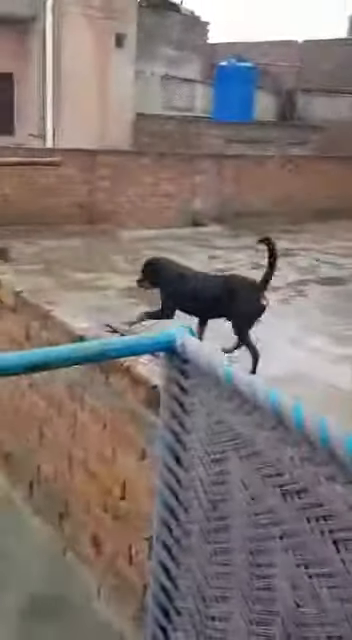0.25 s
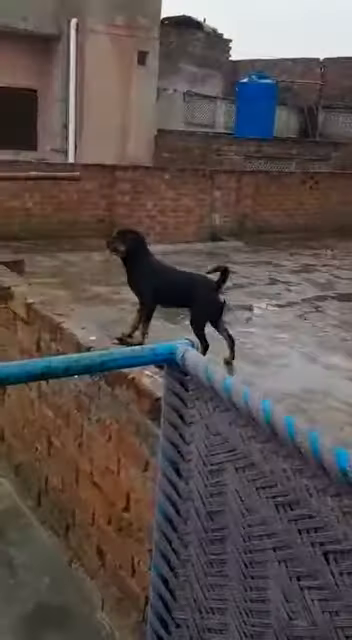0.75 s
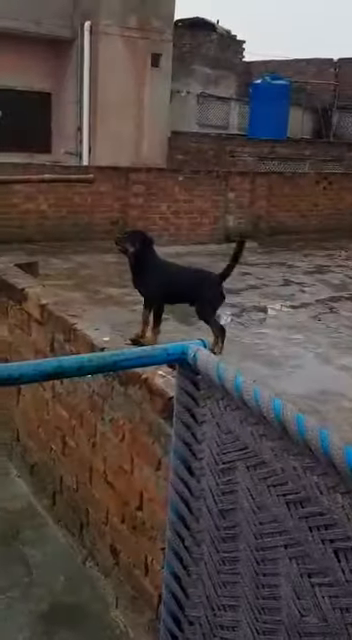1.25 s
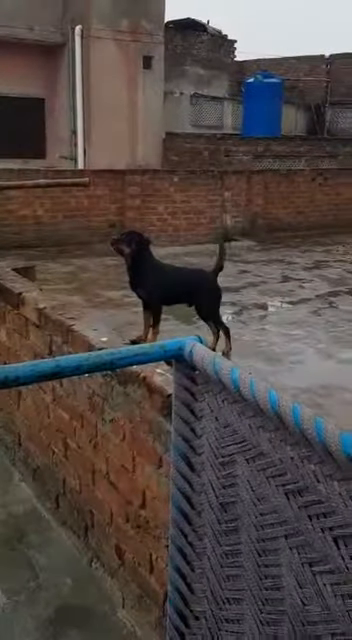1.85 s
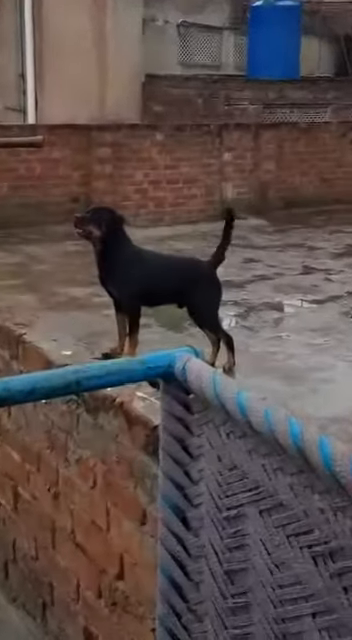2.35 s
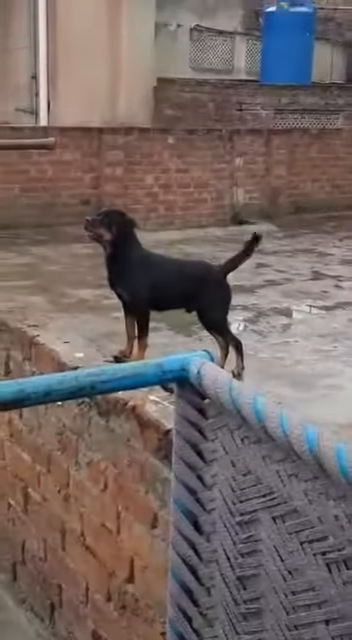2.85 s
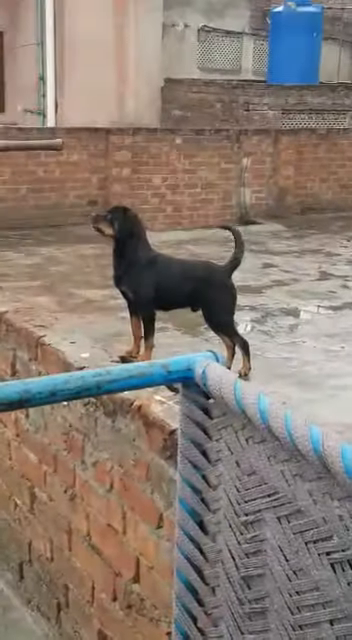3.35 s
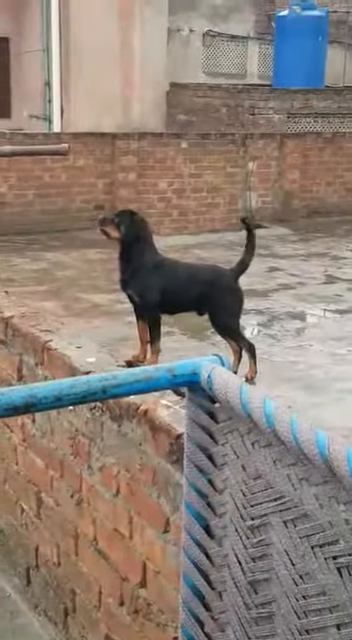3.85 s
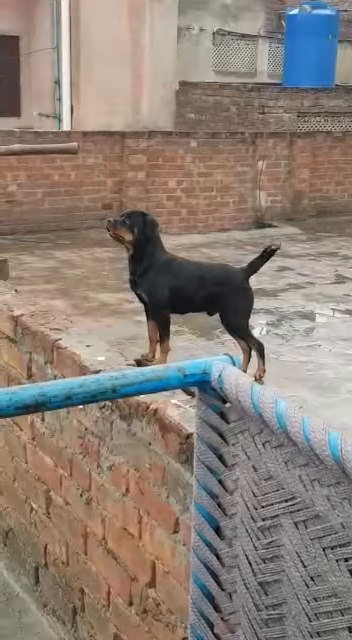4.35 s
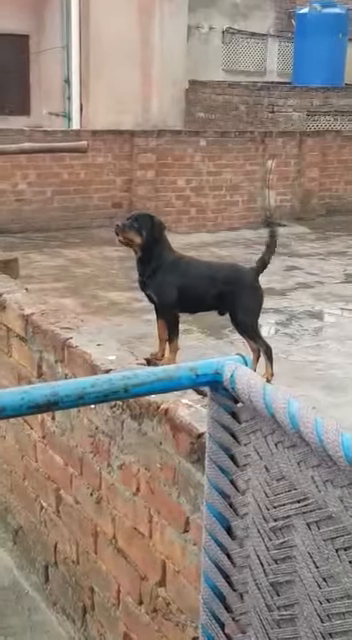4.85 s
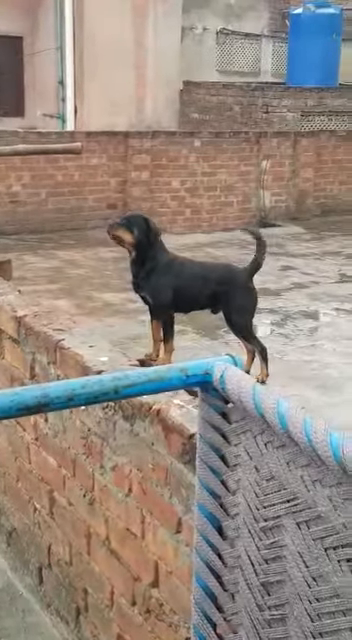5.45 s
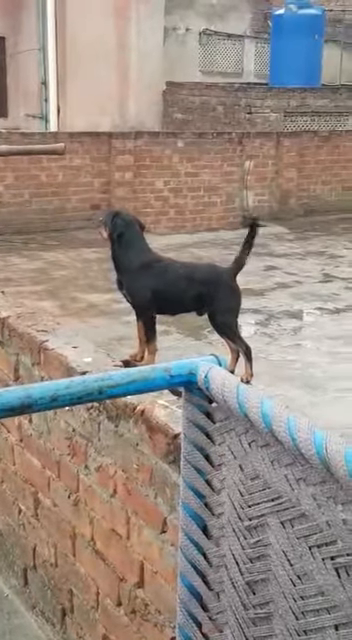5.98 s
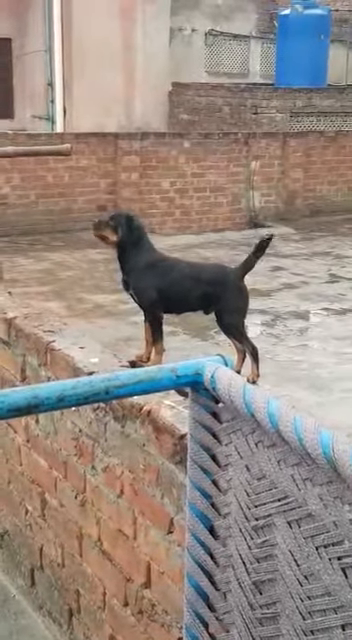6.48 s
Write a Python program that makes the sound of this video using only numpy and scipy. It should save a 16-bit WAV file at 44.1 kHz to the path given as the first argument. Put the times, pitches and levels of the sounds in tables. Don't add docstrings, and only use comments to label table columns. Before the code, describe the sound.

A walled rooftop outdoors, picked up by a stereo phone a few metres from a large dog. A low, distant traffic murmur runs throughout, and the end of a faint huff opens it. Short barks, about a tenth of a second each, glide upward, crack into rough undertones and echo off house fronts with nearly a second of ring. They come at 0.4, then a yip at 0.65 dropping straight into a strong bark at 0.7; then 2.0, 2.3 and 2.6; a very soft woof at 3.1 after a faint nose huff; then 3.9, 4.2 and 4.55. From 4.3 to 4.9 wind buffets the microphone with deep thumps. Around 4.8 to 5.0 the dog huffs sharply and collar links clink. Lighter thumps follow to 5.3, a faint hiss at 5.45, and a barely audible distant brake squeal near 6. Two last barks come at 6.3 and 6.6, with wind returning before the end at 6.7.

```python
import sys
import numpy as np
from scipy import signal
from scipy.fft import rfft, irfft, next_fast_len
from scipy.io import wavfile
from scipy.ndimage import uniform_filter1d, map_coordinates

SR = 44100
rng = np.random.default_rng(int(sys.argv[2]) if len(sys.argv) > 2 else 0)


def pcm_store(signal):
    levels = np.round(np.clip(np.atleast_2d(signal), -1, 1) * 32767)
    wavfile.write(sys.argv[1], SR, levels.astype(np.int16).T)


def makeup_ratio(level_db):
    decades = np.asarray(level_db, float) / 20
    return 10 ** decades


N = 296352

# [f/Hz, width/Hz, level/dB]
UNDERTONE_THROAT = [(701, 99, -3), (1332, 99, -14), (1960, 310, -20)]
RASP_THROAT = [(468, 140, -3.5), (678, 88, 1.5), (1066, 195, -1), (1370, 580, -10), (1980, 590, -14)]
# [f/Hz, level/dB per Hz]
BREATH_COLOUR = [(1500, -29.5), (2600, -22.5), (3400, -15), (3900, 4), (4300, -11.5), (4900, 1.5),
                 (5900, -1.5), (7400, -13), (8200, -29.5), (10000, -19.5), (15700, -34)]


def bark(row, breaking, mouth_db, jitter, shimmer_db):
    start, length, peak_db, first_hz, top_hz = row
    glide, breaks, under_db, rasp_db, breath_db = breaking
    t = np.arange(SR // 4) / SR - .02

    def shake(rate):
        return wobble(rate, size=len(t))

    def left(span):
        return np.clip(1 - t / span, 0, 1)

    after_glide = np.maximum(t - glide, 0)
    pitch = top_hz - (top_hz - first_hz) * left(glide) ** 1.404 - 74 * after_glide
    level_db = peak_db - 12 * left(0.94 * glide) ** 1.67 - 54.5 * after_glide
    whole = np.clip((breaks - t) / 0.018, 0, 1)
    unsteady = jitter * (1 + 1.28 * (1 - whole)) * shake(122.54)
    cycle = 2 * np.pi * np.cumsum(pitch * (1 + unsteady)) / SR

    orders_db = [mouth_db[0], 0, *mouth_db[1:], mouth_db[-1] - 12]
    voice = unit(sum(makeup_ratio(db + shimmer_db * shake(60.7)) * np.cos((k + 1) * cycle + k)
                     for k, db in enumerate(orders_db)))

    thirds = sum(np.cos(k * (cycle + 1.6 * shake(40.03)) / 3) for k in range(2, 14) if k % 3)
    air = rng.standard_normal((2, len(t)))
    puffs = (1 + 0.54 * np.cos(cycle)) * air[0]
    rough = makeup_ratio(under_db - 23.5 * whole) * unit(filtered(thirds, tract(UNDERTONE_THROAT)))
    rough += makeup_ratio(rasp_db - 6 * whole) * unit(filtered(puffs, tract(RASP_THROAT)))
    voice += filtered(rough, lambda f: 1 / (1 + (300 / (f + 1)) ** 6) / (1 + (f / 2400) ** 6))

    ripple = rng.standard_normal(60)

    def teeth(f):
        return np.interp(f / 280, np.arange(60), ripple)

    breath = unit(filtered(air[1], lambda f: makeup_ratio(along(BREATH_COLOUR, f) + 2.2 * teeth(f))))
    voice += makeup_ratio(breath_db - 6 * whole + 1.4 * shake(50)) * breath

    onset = np.clip((t - t[0]) / 0.015, 0, 1) ** 2
    release = np.clip(1 - (t - length) / 0.063, 0, 1) ** 2
    return round((start + t[0]) * SR), makeup_ratio(level_db - 6 * (1 - whole)) * onset * release * voice


# [f/Hz, t60/s]
ROOF_DECAY = [(300, 1), (1000, 0.82), (2000, 1), (5000, 0.83), (12000, 0.32)]


def tail(size):
    hz, t, z = signal.stft(rng.standard_normal((2, size)), SR, nperseg=256)
    swell = 1 - np.exp(-t / 0.031)
    lumps = makeup_ratio(1.1 * wobble(25.8, size=size + 512)[(t * SR).astype(int)])
    decay = makeup_ratio(-60 * t / along(ROOF_DECAY, hz)[:, None])
    x = signal.istft(z * swell * lumps * decay, SR, nperseg=256)[1][:, :size]
    return x / np.linalg.norm(x[0])


BARKS = [(0.415, 0.089, -36.5, 389.6, 398), (0.655, 0.081, -36, 423.4, 554), (0.70, 0.1, -24.5, 477.3, 487),
         (1.986, 0.14, -29, 385, 488.3), (2.297, 0.081, -21.5, 480.5, 520.2),
         (2.63, 0.097, -24.5, 399.6, 502), (3.119, 0.096, -49.5, 440, 476),
         (3.924, .13, -29.5, 400.3, 516.6), (4.231, 0.092, -23, 486, 513.6),
         (4.553, 0.093, -23, 406.2, 547.5), (6.268, 0.14, -29, 381.3, 469.2),
         (6.598, 0.14, -26, 461, 491.5)]
# [glide/s, voice breaks after/s, undertone/dB, rasp/dB, breath/dB]
VOICE_BREAKS = [(0.057, 0.054, -8, 1, -32.5), (.03, .04, -4, 7.5, -29), (.055, 0.065, 1.5, -4, -33),
                (.075, 0.084, 4.5, 4, -27.5), (.06, .04, -9.5, -3, -30), (.065, 0.051, -1.5, -3, -31),
                (0.051, 0.033, -8, 7, -22), (0.0787, 0.072, 4.5, 4, -26), (0.049, .06, -9.5, -3, -32.5),
                (.065, 0.048, -2, -4, -31.5), (0.092, 0.1057, 3.5, 2, -31), (0.0486, 0.1, 6.5, -2.5, -31.5)]
# [harmonic 1/dB, harmonic 3/dB, harmonic 4/dB, echo level/dB]
MOUTH = [(-2, -9.5, -42, -3.5), (0, -20, -30, 1.5), (-13, -14.5, -19.5, -2.5), (-16.5, -5.5, -23, -1.5),
         (-14, -13.5, -31, 0.5), (-14, -15.5, -29, 0.5), (-14, -3, -27, 0), (-9, -6, -23, -1),
         (-25, -17, -41, -0.5), (-16.5, -16, -50, -1.5), (-6.5, -10, -21.5, -1), (-12.5, -13.5, -29.5, 2)]
# [delay t/s, left level/dB, right level/dB]
HOUSE_FRONTS = [(.012, 2, -13.5), (.031, -17, -3), (.058, -26.5, -23.5), (.1, -4.5, -3.5),
                (.135, -5, -13.5), (.2, -14.5, -13), (.44, -29.5, -26.5), (.47, -23.5, -24.5),
                (0.509, -31.5, -28.5)]
# [f/Hz, level/dB]
BRICK = [(200, 0), (1150, -2.5), (1500, -6.5), (2000, -6.5), (2800, -8), (5500, -3.5), (9000, -7)]
# [f/Hz, likeness 0-1]
ECHO_LIKENESS = [(200, 1), (600, 0.8), (1100, 0.5)]
# [f/Hz, left minus right level/dB]
PORT_SHADE = [(300, -2.5), (1200, -1.5), (2800, 2), (6000, -0.5)]


def dog(lag_s, wet_db):
    out = np.zeros((2, N + 2 * SR))
    for row, breaking, (*mouth_db, echo_db) in zip(BARKS, VOICE_BREAKS, MOUTH):
        at, voice = bark(row, breaking, mouth_db, jitter=0.012, shimmer_db=3.5)
        walls = np.zeros((2, SR))
        for s, left_db, right_db in HOUSE_FRONTS:
            walls[[0, 1], round(s * SR) + rng.integers(0, 12, 2)] = makeup_ratio([left_db, right_db])
        walls = filtered(walls, lambda f: makeup_ratio(along(BRICK, f)))
        path = makeup_ratio(echo_db) * (walls + makeup_ratio(wet_db) * paired(tail(size=SR), BRICK, ECHO_LIKENESS))
        path[:, 20:220] += makeup_ratio(-29) * rng.standard_normal((2, 200))
        path[:, 8:59] += makeup_ratio(-10) * np.diff(np.diff(rng.standard_normal((2, 53))))
        path[0, 0] += makeup_ratio(1.3)
        path[1, round(lag_s * SR)] += makeup_ratio(0.65)
        heard = signal.fftconvolve(voice[None], path, axes=1)
        out[:, at:at + heard.shape[1]] += heard
    return filtered(out[:, :N], lambda f: makeup_ratio(along(PORT_SHADE, f) * [[.5], [-.5]]))


# [peak t/s, peak level/dB, rise/s, fall/s]
HUFFS = [
    (0.005, -66.5, .03, .1),
    (1.65, -76.5, .03, .15),
    (3.175, -70, .09, 0.15),
    (4.82, -70, 0.019, 0.45),
    (4.925, -70, .03, .12),
]
# [f/Hz, level/dB per Hz]
NOSE_COLOUR = [(880, -21), (1500, 0.5), (1610, -14.5), (2500, -9.5), (3200, -28), (4420, -18),
               (5380, -16.5), (5820, -17), (7370, -27), (8540, -38), (9610, -29), (15700, -36.5)]


def huffs():
    return makeup_ratio(11) * faded(HUFFS) * rush(NOSE_COLOUR, [(500, 0.6), (4000, 0.18)], patchy_db=-0.5)


# [t/s, peak level/dB, f/Hz, t60/s]
COLLAR = [
    (4.827, -61, 3460, 0.22),
    (4.86, -55, 3480, .12),
    (4.832, -56, 5500, 0.073),
    (4.922, -51, 5400, .08),
    (4.945, -56, 5500, .08),
    (4.971, -58, 5464, 0.13),
]


def collar():
    out = np.zeros((2, N))
    t = np.arange(SR // 5) / SR
    for s, db, hz, t60 in COLLAR:
        phase = 0.91 * wobble(300, size=len(t)) + rng.uniform(0, 5.4, (2, 1))
        ring = np.sin(2 * np.pi * hz * t + phase)
        out[:, round(s * SR):][:, :len(t)] += makeup_ratio(db - 60 * t / t60) * (1 - np.exp(-t / 0.0018)) * ring
    return out


# [t/s, peak level/dB, f/Hz, left minus right level/dB]
THUMPS = [(3.285, -24.5, 75, -6), (3.751, -24, 63, -1), (3.944, -29.5, 144, -6), (4.09, -31, 138, 3),
          (4.264, -25, 65.44, 9), (4.324, -16.5, 84, -0.5), (4.435, -18, 68.3, -0.5), (4.53, -11, 105.2, 1),
          (4.579, -15.5, 62, 2), (4.596, -19, 69.6, 9), (4.658, -13, 59, 4), (4.751, -21.5, 76.5, -7),
          (4.822, -22, 91, 0), (4.845, -15.5, 77, 5), (4.875, -18, 98, 14), (5.105, -22.5, 58.4, -5),
          (5.123, -23, 71, 4), (5.22, -18.5, 66.8, 5), (5.237, -23, 63, 0), (5.264, -23, 66.2, 3),
          (5.322, -29, 90, 20), (6.211, -35.5, 57, 20), (6.675, -22, 61, 6), (6.699, -21, 67.3, 0)]


def thumps():
    out = np.zeros((2, N))
    t = np.arange(SR // 10) / SR
    for s, db, hz, side_db in THUMPS:
        turn = 2 * np.pi * hz * t + np.pi + rng.uniform(-1.64, 1.1, (2, 1))
        swell = (t / 0.0046) * np.exp(1 - t / 0.006)
        push = (np.sin(turn) + 0.29 * np.sin(2.276 * turn)) * swell
        spot = out[:, round(s * SR):][:, :len(t)]
        port_db = db - 8.5 + np.array([[side_db], [-side_db]]) / 2
        spot += (makeup_ratio(port_db) * push)[:, :spot.shape[1]]
    return out


# [t/s, buffet level/dB, left minus right level/dB]
WIND = [(0.0, -57.5, -25), (1.3, -62, -12), (1.6, -48, -0.5), (3.2, -50, -3), (3.7, -47.5, -9.5),
        (4.0, -44.5, 2), (4.28, -35.5, -3), (4.4, -34, -1.5), (4.6, -26.5, -2.5), (4.72, -32.5, -1.5),
        (4.86, -25, 1), (4.96, -47.5, -21), (5.2, -43.5, -7), (5.36, -47, 22), (5.5, -49, 10),
        (6.15, -55, 24.5), (6.36, -36, 4), (6.72, -34, 4.5)]
# [f/Hz, level/dB per Hz]
BUFFET_COLOUR = [(12, -43), (25, -15), (55, 0.5), (97, -3), (130, -6), (211, -12), (443, -18), (650, -57),
                 (1100, -120)]


def wind():
    level_db, pan_db = curves(WIND, np.arange(N) / SR)
    lumps = makeup_ratio(4.8 * wobble(14) + 3.25 * np.array([wobble(25), wobble(25)]))
    port_db = level_db + np.array([pan_db, -pan_db]) / 2
    return makeup_ratio(port_db) * unit(lumps * rush(BUFFET_COLOUR, [(30, 0.034)], patchy_db=3.0))


# [peak t/s, peak level/dB, rise/s, fall/s]
GUST = [
    (5.45, -69.5, 0.18, 0.34),
]
# [f/Hz, level/dB per Hz]
HISS_COLOUR = [(880, -36), (1500, -25), (2090, -5), (3040, -10.5), (5940, -11.5), (11900, -23),
               (15700, -31)]


def gust_hiss():
    return faded(GUST) * makeup_ratio([[9], [6]]) * rush(HISS_COLOUR, [(2000, 0.069)], patchy_db=3.5)


# [from t/s, to t/s, f/Hz, level/dB]
BRAKES = [
    (5.95, 6.32, 2970, -75),
    (5.85, 6.25, 3320, -81),
]


def brakes():
    t = np.arange(N) / SR
    out = np.zeros(N)
    for start, end, hz, db in BRAKES:
        swell = np.clip(np.minimum(t - start, end - t) / .05, 0, 1)
        out += makeup_ratio(db + 2 * wobble(23)) * swell * np.sin(2 * np.pi * hz * t + 1.5 * wobble(25))
    return out


# [t/s, level/dB]
MURMUR = [(0, -46.5), (.3, -46.5), (.65, -44.5), (1.1, -45), (1.6, -46), (3.0, -43.5), (3.4, -46),
          (3.8, -46), (5.1, -46), (5.7, -48.5), (6.72, -46)]
# [f/Hz, level/dB per Hz]
TOWN_COLOUR = [(24, -38.5), (40, -5.5), (77, -6), (190, -9.5), (390, -6.5), (650, -13), (1000, -11),
               (1900, -22), (2800, -35), (5100, -37.5), (6700, -46.5), (8400, -59), (11000, -46),
               (15700, -45)]
# [f/Hz, likeness 0-1]
TOWN_LIKENESS = [(60, 0.46), (180, 1), (550, 0.78), (1650, 0.082), (4970, 0.02), (15000, 0.01)]


def town():
    level_db = curves(MURMUR, np.arange(N) / SR)[0] + 0.13 * wobble(18.0)
    return makeup_ratio(level_db) * rush(TOWN_COLOUR, TOWN_LIKENESS, patchy_db=1.0)


def unit(x):
    return x / np.sqrt(np.mean(x ** 2) + 1e-20)


def along(points, hz):
    f, v = np.transpose(points)
    return np.interp(np.log(hz + 1), np.log(f + 1), v)


def curves(rows, t):
    s, *cols = np.transpose(rows)
    return [np.interp(t, s, c) for c in cols]


def wobble(rate, size=N):
    knots = rng.standard_normal(int(size * rate / SR) + 4)
    return map_coordinates(knots, [np.arange(size) * rate / SR])


def faded(rows):
    t = np.arange(N) / SR
    return sum(makeup_ratio(db - 20 * np.maximum((s - t) / rise, (t - s) / fall)) for s, db, rise, fall in rows)


def filtered(x, response):
    n = x.shape[-1]
    m = next_fast_len(n + 8192)
    return irfft(rfft(x, m) * response(np.fft.rfftfreq(m, 1 / SR)), m)[..., :n]


def tract(modes):
    def response(f):
        return sum((-1) ** k * makeup_ratio(db) * 1j * f * w / (c * c - f * f + 1j * f * w)
                   for k, (c, w, db) in enumerate(modes))
    return response


def paired(two, spectrum, alike):
    def response(hz):
        turn = np.arccos(np.clip(along(alike, hz), -1, 1)) / 2
        return makeup_ratio(along(spectrum, hz)) * [np.cos(turn), np.sin(turn)]
    mid, side = filtered(two, response)
    return np.array([mid + side, mid - side])


def rush(spectrum, alike, patchy_db):
    z = signal.stft(rng.standard_normal((2, N)), nperseg=512)[2]
    field = uniform_filter1d(rng.standard_normal(z.shape[1:]), 6, 0)
    field = uniform_filter1d(field, 14, 1)
    patchy = signal.istft(z * makeup_ratio(patchy_db * unit(field)), nperseg=512)[1][:, :N]
    return unit(paired(patchy, spectrum, alike))


def scene():
    return dog(lag_s=.00019, wet_db=-3) + huffs() + collar() + thumps() + wind() + gust_hiss() + brakes() + town()


# [f/Hz, level/dB under the loudest band of the moment, constant limit level/dB]
MASK = [(2500, -66, -125), (3160, -55, -117), (5030, -54, -120), (7200, -70.5, -108), (8400, -65, -107),
        (11000, -68.5, -110), (14000, -67.5, -113)]


def thinned(x, scatter_db, cut_db):
    hz, _, z = signal.stft(x, SR, nperseg=2048)
    bands = np.abs(z[:, :1024]).reshape(2, 128, 8, -1)
    level = np.sqrt(np.mean(bands ** 2, 2))
    centre = hz[4:1024:8]
    under_db, limit_db = (along([(row[0], row[k]) for row in MASK], centre)[:, None] for k in (1, 2))
    loudest = level[:, 2:].max(1, keepdims=True)
    limit = np.maximum(loudest * makeup_ratio(under_db), makeup_ratio(limit_db))
    scatter = makeup_ratio(scatter_db * rng.standard_normal(level.shape[1:]))
    weak = (level.mean(0) < limit.mean(0) * scatter) & (centre > 2500)[:, None]
    gain = np.repeat(np.where(weak, makeup_ratio(cut_db), 1), 8, 0)
    gain = np.pad(gain, ((0, 1), (0, 0)))
    return signal.istft(z * gain, SR, nperseg=2048)[1][:, :N]


def top_cut(x):
    return signal.sosfilt(signal.butter(12, 15870, fs=SR, output="sos"), x)


def record(dry):
    soft = dry * np.clip((N - np.arange(N)) / (.004 * SR), 0, 1)
    mix = thinned(soft, scatter_db=6.0, cut_db=-28.5)
    return top_cut(mix)


dry = scene()
out = record(dry)
pcm_store(out)
```